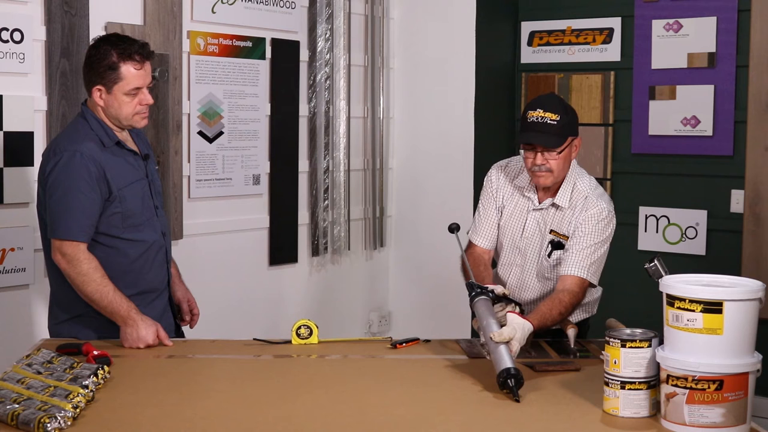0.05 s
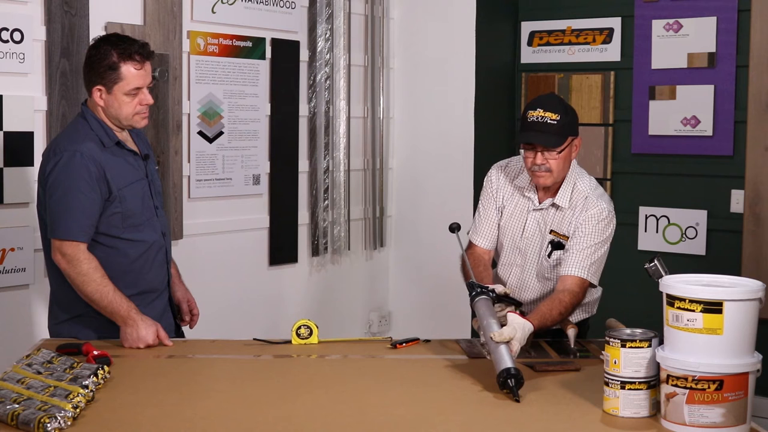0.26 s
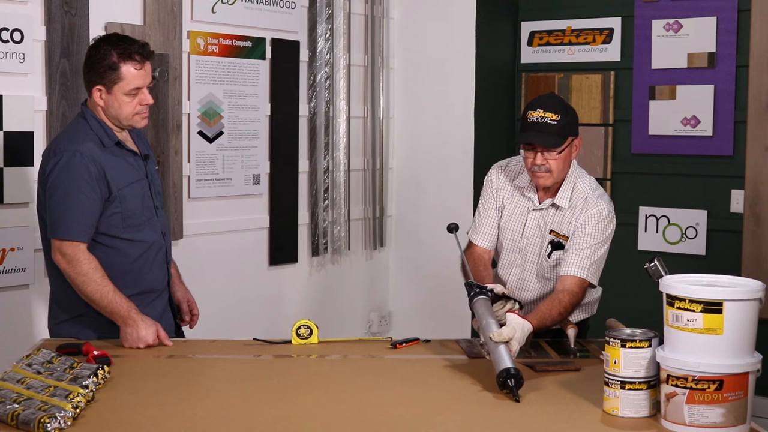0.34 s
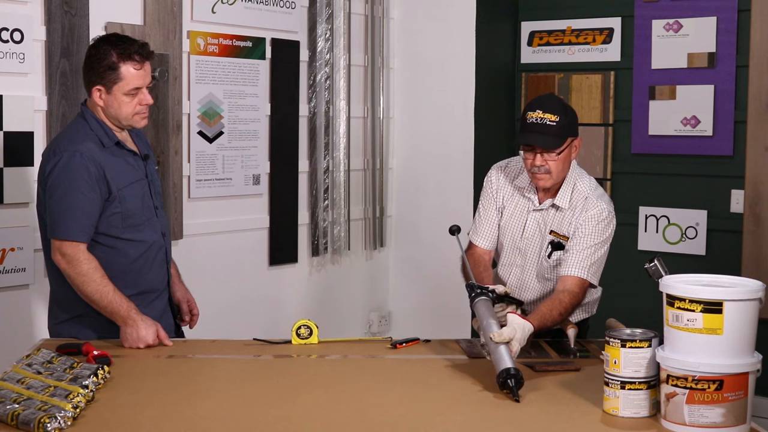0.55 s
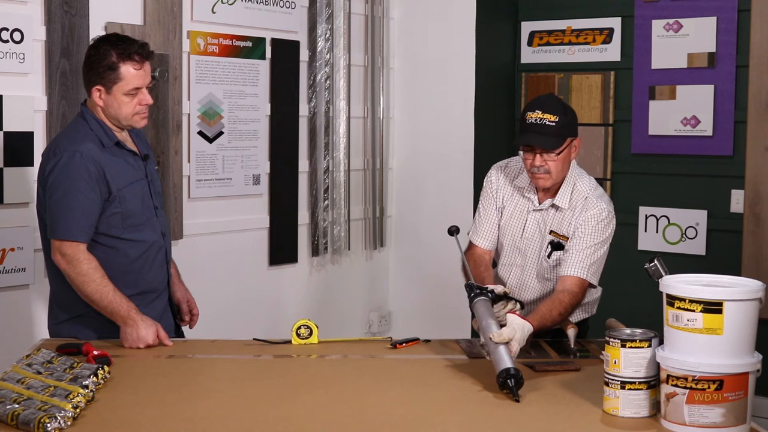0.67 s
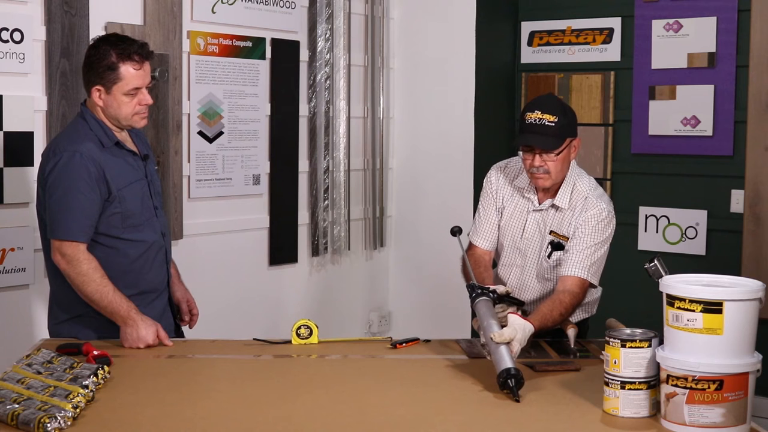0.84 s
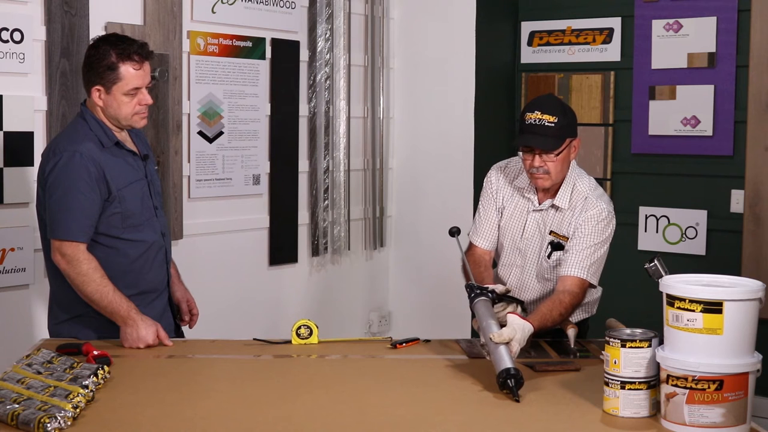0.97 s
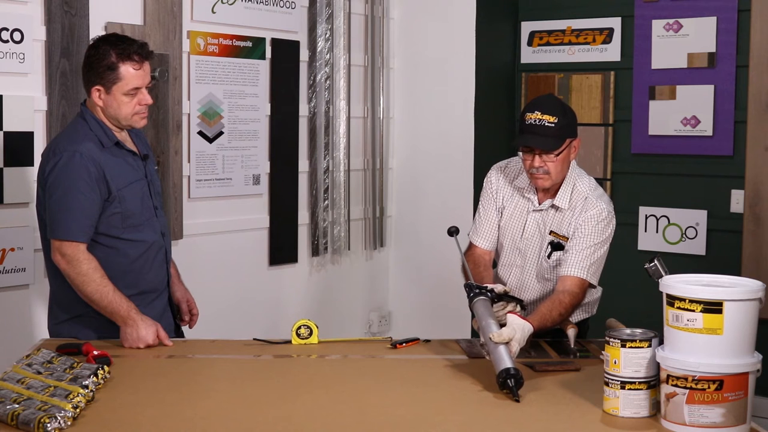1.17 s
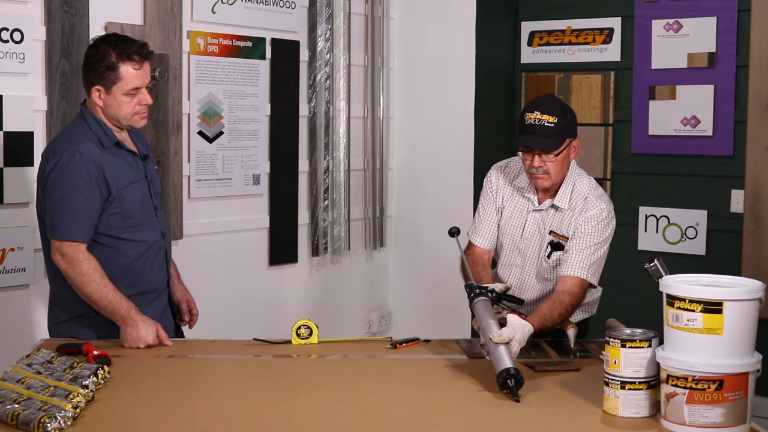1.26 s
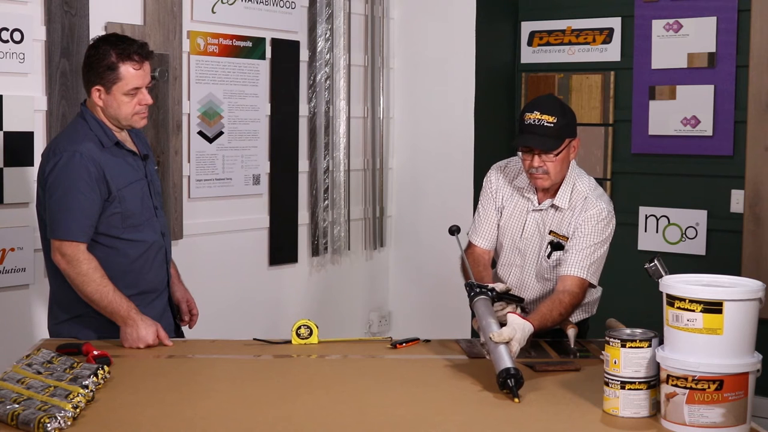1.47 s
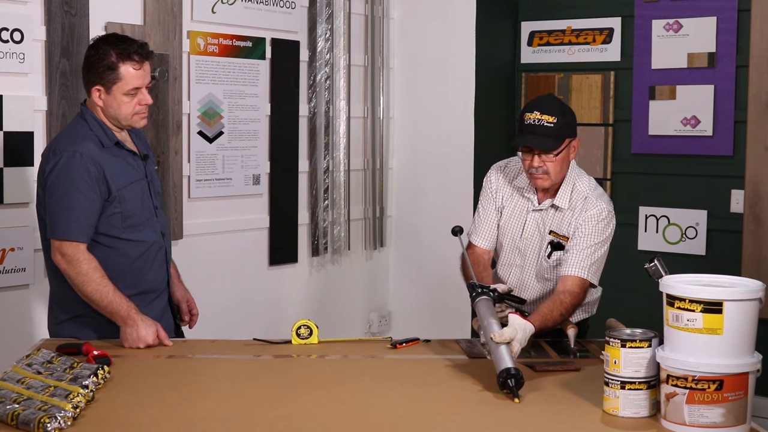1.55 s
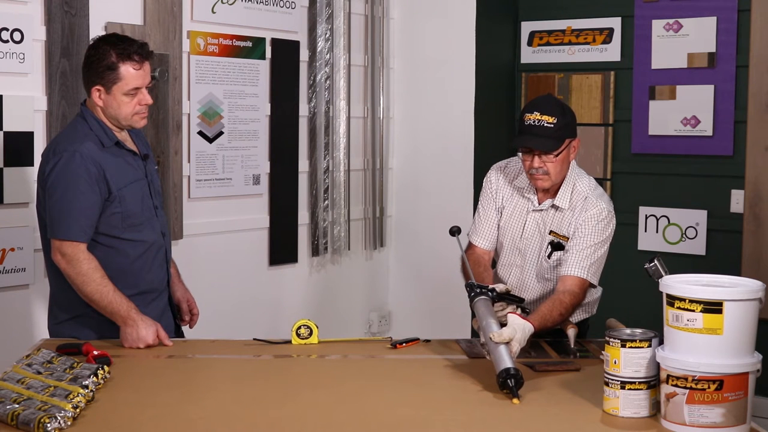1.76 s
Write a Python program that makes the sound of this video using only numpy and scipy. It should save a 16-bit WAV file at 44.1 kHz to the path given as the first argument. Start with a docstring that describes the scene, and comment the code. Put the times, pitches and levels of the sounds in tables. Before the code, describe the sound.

Fast trigger strokes on a hand caulking gun give clusters of dry clicks and thin high squeaks, with a hard clack and then a weaker one near the middle; hard walls echo, faint room noise beneath, microphone fairly near.

```python
"""A hand caulking gun is pumped three to four times a second in a hard-walled workshop.
Squeezing the trigger gives a short creak and a run of clicks as the grip plate bites the rod;
letting go gives a rub and a high squeak; twice the plate snaps back loudly. Touches ring the metal's modes,
slips make stacks of overtones, and decaying noise makes the echo. Under it lie room noise and a faint low tone."""
import sys
import numpy as np
from scipy import signal
from scipy.fft import rfft, irfft
from scipy.io import wavfile

SR = 44100
rng = np.random.default_rng(int(sys.argv[2]) if len(sys.argv) > 2 else 0)


def generate_wav(signal):
    """Clip the signal to [-1, 1] and save it as 16-bit WAV at the path in sys.argv[1]."""
    frames = np.transpose(np.atleast_2d(signal))
    scaled = np.clip(frames, -1, 1) * 32767
    pcm = np.round(scaled).astype(np.int16)
    wavfile.write(sys.argv[1], SR, pcm)


def gain_from_decibels(decibels):
    """Convert decibel values to linear amplitude factors."""
    exponent = np.asarray(decibels, float) / 20
    return 10 ** exponent


N = 79380  # 1.8 s
T = np.arange(N) / SR


def rms_one(x):
    """Scales a signal to an rms of 1."""
    return x / np.sqrt(np.mean(x ** 2) + 1e-20)


def on_log(points, hz, column=1):
    """Reads a table column at any frequency, with straight lines over log frequency."""
    p = np.array(points, float)
    return np.interp(np.log(np.maximum(hz, 1)), np.log(p[:, 0]), p[:, column])


def drift(rate_hz, size=N):
    """Smooth random wander of rms 1: noise with all that is faster than about rate_hz weakened."""
    r = np.exp(-2 * np.pi * rate_hz / SR)
    noise = rng.standard_normal(size + 4000)
    return rms_one(signal.lfilter([1], [1, -2 * r, r * r], noise)[4000:])  # skip the filter's start


def add(out, start_s, x):
    """Mixes a sound into out from start_s on."""
    i = max(int(start_s * SR), 0)
    out[i:i + len(x)] += x[:N - i]


def rms_over(x, length_s):
    """Rms that the energy of x would give if spread over length_s."""
    return np.sqrt(np.sum(x ** 2) / (SR * length_s))


def struck(focus_hz, treble_db, focus_db=10, chance=1, ring=1, contact_s=.0006):
    """Answer of the gun to one touch: ringing modes, stronger near the touched part, and a short noise crack.

    treble_db counts per octave above 3 kHz, for two octaves; ring stretches the modes and the crack."""
    # ringing modes of frame, rod and plate: pitch_hz, level_db, t60_s (time to fall by 60 dB at ring 1)
    gun_modes = [(456, -16, 0.013), (637, -14, 0.014), (1021, -11, 0.017), (1499, -6, 0.013),
                 (2068, -4.5, 0.0095), (2600, -6, 0.007), (3120, 0, 0.0059), (3580, -6, 0.01),
                 (4046, -6.5, 0.0097), (4587, -13, 0.014), (5247, -11, 0.0091), (6076, -12.5, 0.013),
                 (7580, -12.5, 0.0048), (8700, -19, 0.0076), (10350, -19.5, 0.0046), (12030, -28, 0.011),
                 (13800, -29, .006)]
    focus_octaves, crack_db, crack_s = 0.24, 15, 0.001
    spread_db, detune_share = 2.5, .015  # random differences of the modes at chance 1
    hz, db, t60 = np.transpose(gun_modes)
    z, t = rng.standard_normal((3, len(hz))), T[:2048]
    db = db + treble_db * np.clip(np.log2(hz / 3000), 0, 2)

    # the crack is noise with the same colour as the modes
    colour = gain_from_decibels(on_log(np.c_[hz, db], np.fft.rfftfreq(len(t), 1 / SR)))
    noise = irfft(rfft(rng.standard_normal(len(t))) * colour)
    crack = gain_from_decibels(crack_db) * noise * np.exp(-t / (ring * crack_s))

    focus = np.exp(-(np.log2(hz / focus_hz) / focus_octaves) ** 2)
    db = db + chance * spread_db * z[0] + focus_db * focus
    hz = hz * (1 + chance * detune_share * z[1])
    signs = np.sign(chance * z[2] + .5 * (-1) ** np.arange(len(hz)))
    ringing = np.sin(2 * np.pi * np.outer(hz, t)) * gain_from_decibels(-60 * t / (ring * t60[:, None]))
    modes = (gain_from_decibels(db) * signs) @ ringing

    # the touched part's own note
    own = chance * gain_from_decibels(focus_db - 9.0) * np.sin(2 * np.pi * focus_hz * t) * gain_from_decibels(-60 * t / 0.013)
    return (modes + own + crack) * (1 - np.exp(-t / contact_s))  # soft onset


def touches(per_s):
    """Uneven random contacts: single pulses of either sign, a few of them much stronger."""
    u = rng.random((3, 4000))
    happens = u[0] < per_s / SR
    strength = gain_from_decibels(-3.0 * np.log(u[2] + .03))
    return happens * np.sign(u[1] - .5) * strength


def clicks():
    """The grip plate bites: a first touch rings the metal, then a few milliseconds of dying chatter."""
    # metal contacts: start_s, strength_db, strongest_region_hz, treble_db (per octave above 3 kHz)
    click_table = [(.208, -26, 3860, 0), (0.2185, -28.5, 3400, 2.5), (.227, -38, 1040, 5),
                   (.224, -21.5, 2820, -2), (0.234, -33.5, 4060, 7.5), (.239, -30.5, 2470, 6.5),
                   (.286, -40.5, 3180, 1), (0.328, -39, 1106, -23), (.34, -33, 1600, 0),
                   (.508, -38, 2170, 11.5), (.515, -25.5, 3173, 1.5), (0.5245, -28.5, 3680, 2),
                   (.529, -21.5, 2580, -2.5), (.533, -37, 1060, 2), (0.543, -31, 2555, 5),
                   (.583, -31, 3600, 0), (0.8157, -22.5, 3760, 1.5), (.826, -27.5, 2400, 7.5),
                   (0.829, -28.5, 2980, 6), (.84, -29, 2820, 2), (0.842, -28, 2950, 6),
                   (.866, -35.5, 3420, 5), (.872, -39, 2060, 4), (1.077, -28, 3700, -1),
                   (1.103, -28.5, 3060, 10.5), (1.309, -27.5, 3560, 3), (1.319, -35.5, 3000, -12),
                   (1.346, -30, 3480, 10), (1.44, -30.5, 1893, -15), (1.569, -28.5, 3670, -1),
                   (1.581, -33, 2600, 4), (1.584, -30, 3120, 2), (1.5965, -33, 2520, 2.5),
                   (1.626, -42.5, 1718, 3.5)]
    chatter_s, chatter_share, touches_per_s = .0028, .28, 2600
    out = np.zeros(N)
    for start_s, db, hz, treble_db in click_table:
        hit = chatter_share * touches(touches_per_s)[:800] * np.exp(-(T[:800] / chatter_s) ** 2)
        hit[0] = 1  # the first touch
        x = np.convolve(hit, struck(hz, treble_db))
        add(out, start_s, gain_from_decibels(db - 6.0) * x / rms_over(x, .003))
    return out


def snaps():
    """The plate snaps back: a hard blow at the same spot, so the modes nearly keep their balance, and a bounce."""
    # blows: start_s, strength_db, treble_db (per octave above 3 kHz), lift of the plate's region_db
    snap_table = [(0.6709, -2.5, 0.5, 6.5), (.967, -14, -5, 8.5)]
    plate_hz, contact_s, bounce_s, bounce_db = 3130, 0.00056, .0039, -11.5
    # so brief a blow moves the heavy frame little: the lows are weakened
    lean = signal.butter(1, 1700, "high", fs=SR)
    out = np.zeros(N)
    for start_s, db, treble_db, focus_db in snap_table:
        for late_s, change_db in [(0, 0), (bounce_s, bounce_db)]:
            x = struck(plate_hz, treble_db, focus_db, chance=.3, ring=1.23, contact_s=contact_s)
            x = signal.lfilter(*lean, x)
            add(out, start_s + late_s, gain_from_decibels(db + change_db - 6.0) * x / rms_over(x, .003))
    return out


def rubs():
    """Parts rub: dense grains of contact under a short stroke make the metal ring."""
    # strokes: start_s, length_s, rms_db, strongest_region_hz, treble_db (per octave above 3 kHz)
    rub_table = [(.0, 0.043, -53, 2250, 2.5), (0.027, 0.031, -51, 2150, 10), (0.198, 0.028, -44, 3000, 8.5),
                 (.305, 0.078, -52.5, 1770, 3), (0.325, 0.01, -49, 1700, 11), (0.473, 0.041, -60, 2470, -4),
                 (0.504, 0.036, -39, 2540, 5), (.605, 0.075, -46, 1700, 2.5),
                 (0.63, 0.026, -38, 1500, 10.5), (0.804, 0.013, -42, 2600, 6.5),
                 (0.901, 0.047, -53, 2280, 9), (1.06, 0.028, -45.5, 2390, 4.5),
                 (1.107, 0.081, -57.5, 2373, 5), (1.285, 0.079, -54, 2400, 0),
                 (1.385, 0.073, -56.5, 1660, 6), (1.589, 0.037, -59, 1990, 8)]
    grains_per_s = 6400
    out = np.zeros(N)
    for start_s, length_s, db, hz, treble_db in rub_table:
        stroke = np.sin(np.pi * np.clip(T[:4000] / length_s, 0, 1)) ** 0.51
        x = signal.fftconvolve(touches(grains_per_s) * stroke, struck(hz, treble_db))
        add(out, start_s, gain_from_decibels(db) * x / rms_over(x, length_s))
    return out


def creaks():
    """The pivot slips nearly regularly and slows down: a stack of overtones, the higher ones less steady."""
    # creaks: start_s, length_s, rms_db, slip_rate_hz, change of the third multiple_db
    creak_table = [(0.024, 0.074, -60.5, 800, 33), (0.1967, 0.012, -41.5, 685, -7),
                   (0.5064, 0.012, -39, 710, -3.5), (0.611, 0.027, -49, 640, 17),
                   (0.8047, 0.012, -37.5, 730, -8), (1.0599, 0.014, -35, 705, -10.5),
                   (1.286, 0.03, -38.5, 687, -5.5), (1.542, 0.024, -44, 692, 3.5)]
    # balance of a creak: level_db per multiple of the slip rate
    creak_levels = [-19.5, -1, -2, -14, -23, -22.5, -24.5]
    # balance of the groan: level_db per multiple of the slip rate
    groan_levels = [-7, -22, -1, -22, -3]
    # swell shape (no unit): first two multiples (above 1, peak late), then the higher ones (peak mid-way)
    swell_shape = [1.36, 0.99]
    sag_share, jitter_share, size = .03, .032, 2500  # fall and wander of the slip rate; samples
    rows = []
    for *row, third_db in creak_table:
        is_third = np.arange(len(creak_levels)) == 2
        rows.append((*row, np.add(creak_levels, third_db * is_third)))
    rows.append((.6325, .025, -41, 351, groan_levels))  # groan: slower slips before the first snap

    out = np.zeros(N)
    for start_s, length_s, db, rate_hz, levels in rows:
        u = np.clip(T[:size] / length_s, 0, 1)
        rate = rate_hz * (1 + sag_share * (.5 - u) + jitter_share * drift(150, size))
        phase = np.cumsum(rate) * 2 * np.pi / SR
        x = np.zeros(size)
        for k, level_db in enumerate(levels):
            level = gain_from_decibels(level_db + (1.5 + .5 * k) * drift(300, size))
            swell = np.sin(np.pi * u ** swell_shape[int(k > 1)])
            x += level * np.sin((k + 1) * phase + k * k) * swell
        add(out, start_s, gain_from_decibels(db) * x / rms_over(x, length_s))
    return out


def squeaks():
    """The plate sticks and slips on the rod; the main line flickers, the overtones blur into narrow noise."""
    # swells: peak_s, rise_s, fall_s (from or to 43 percent of the peak), level_db, pitch_hz
    squeak_table = [(0.058, 0.0031, 0.0077, -28.5, 3443), (.076, 0.0037, 0.0077, -28, 3506),
                    (0.357, 0.0034, 0.0037, -22.5, 3465), (0.37, 0.0055, 0.0017, -30, 3500),
                    (0.372, 0.0025, 0.0016, -43, 3935), (.64, 0.0051, 0.0044, -27, 3394),
                    (0.649, 0.00433, 0.0025, -29, 3460), (0.653, .002, .0015, -34, 3790),
                    (0.925, 0.0049, 0.0022, -31, 3427), (0.93, 0.0035, 0.0027, -30, 3476),
                    (.942, 0.0017, 0.00089, -28.5, 3740), (1.177, 0.0062, 0.005, -31.5, 3427),
                    (1.195, 0.007, 0.0094, -38, 3545), (1.433, 0.0051, 0.0065, -34, 3506),
                    (1.45, 0.0022, 0.014, -48, 3584)]
    # balance: level_db per multiple of the squeak pitch, added to each swell's level
    squeak_levels = [-3, -27, -28.5, -33.5]
    rough_db, blur_hz = 1.8, 90
    growth = 0.39  # overtones rise faster than the main line as a squeak swells
    rows = np.array(squeak_table)
    swells = []
    for peak_s, rise_s, fall_s, db, _ in rows:
        steps = 1.5 * (T - peak_s) / np.where(T < peak_s, rise_s, fall_s)
        swells.append((gain_from_decibels(db), 1 / np.cosh(np.clip(steps, -30, 30))))

    pitch = np.interp(T, rows[:, 0], rows[:, 4]) * (1 + .002 * drift(100))
    phase = np.cumsum(pitch) * 2 * np.pi / SR
    out = np.zeros(N)
    for k, level_db in enumerate(squeak_levels):
        blur = 1 + drift(blur_hz * k) if k else gain_from_decibels(rough_db * drift(110))
        swell = sum(top * shape ** (1 + growth * k) for top, shape in swells)
        out += gain_from_decibels(level_db) * blur * np.sin((k + 1) * phase) * swell
    return out


def walls(x):
    """Echo: weak early scatter, a strong far wall, then a noise tail that dies band by band."""
    # tail of the room: pitch_hz, level_db, t60_s (time to fall by 60 dB)
    room_table = [(297, -14.5, 0.63), (720, -11.5, 0.83), (1500, -19.5, 0.71), (3000, -24, 1),
                  (5000, -17.5, 0.7), (8000, -12.5, 0.39), (12000, -19.5, 0.51)]
    bench_s, bench_db = 0.0048, -1.5
    wall_s, wall_db, wall_spread_s = .0185, 10.5, 0.0067
    t, tail = T[:N // 2], 0
    edges = np.geomspace(200, 16000, 13)
    for low, high in zip(edges, edges[1:]):
        hz = np.sqrt(low * high)
        band_filter = signal.butter(2, [low, high], "band", fs=SR, output="sos")
        band = signal.sosfilt(band_filter, rng.standard_normal(len(t)))
        t60 = on_log(room_table, hz, column=2)
        tail = tail + band * gain_from_decibels(on_log(room_table, hz) - 60 * t / t60)

    late = t > wall_s
    # the wall's lift sinks back to 0 dB
    wall = gain_from_decibels(wall_db * np.exp(-(t - wall_s) * late / wall_spread_s))
    shape = (t > bench_s) * np.where(late, wall, gain_from_decibels(bench_db))
    return signal.fftconvolve(x, tail * shape / np.sqrt(SR * 0.032))[:N]


def background():
    """Steady coloured room noise and a faint wavering low tone with a line at three times its pitch."""
    # colour of the room noise: pitch_hz, relative level_db (per Hz)
    floor_table = [(30, -21.5), (55, -11.5), (150, -3.5), (260, -6.5), (340, -10), (500, -14), (720, -11.5),
                   (900, -20.5), (2200, -23), (5000, -37), (12000, -41.5), (16000, -42)]
    # path of the low tone: time_s, pitch_hz, rms level of its main line_db (before a small random wander)
    tone_table = [(0, 273.1, -62.5), (0.151, 268.6, -68), (0.379, 215.2, -64.5), (.65, 228.3, -59),
                  (0.852, 252, -55), (1.0, 255, -73), (1.181, 265, -67.5), (1.27, 266.2, -56.5),
                  (1.361, 268.7, -69), (1.48, 272.7, -59), (1.62, 251.6, -82.5)]
    floor_rms_db, third_db = -55, -18.5
    hz = np.fft.rfftfreq(N, 1 / SR)
    noise = rms_one(irfft(rfft(rng.standard_normal(N)) * gain_from_decibels(on_log(floor_table, hz)), N))

    time_s, pitch, db = np.transpose(tone_table)
    phase = np.cumsum(np.interp(T, time_s, pitch)) * 2 * np.pi / SR
    tone = np.sin(phase) + gain_from_decibels(third_db + 6.2 * drift(2.7)) * np.sin(3 * phase)
    tone_level = np.sqrt(2) * gain_from_decibels(np.interp(T, time_s, db) + 0.97 * drift(10))
    return gain_from_decibels(floor_rms_db) * noise + tone_level * tone


def scene():
    """The gun, its echo in the room and the background."""
    # the small frame radiates little bass
    low_cut = signal.butter(2, 260, "high", fs=SR, output="sos")
    contacts = signal.sosfilt(low_cut, clicks() + snaps() + rubs())
    gun = contacts + creaks() + squeaks()
    return (gun + walls(gun) + background())[None]


def band_limit(x):
    """A steep low-pass at the top of the band."""
    return signal.sosfilt(signal.butter(12, 16450, fs=SR, output="sos"), x)


def record(dry):
    """Peaks are rounded, then the top of the treble is cut."""
    rounded = np.tanh(dry)
    top_cut = signal.cheby2(10, 60, 16500, fs=SR, output="sos")  # 60 dB down from 16.5 kHz on
    mix = signal.sosfilt(top_cut, rounded)
    return band_limit(mix)


dry = scene()
out = record(dry)
generate_wav(out)
```